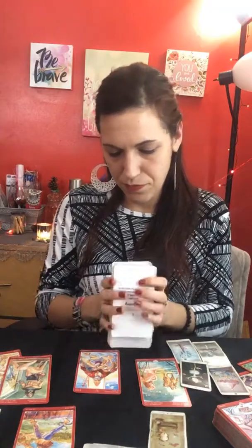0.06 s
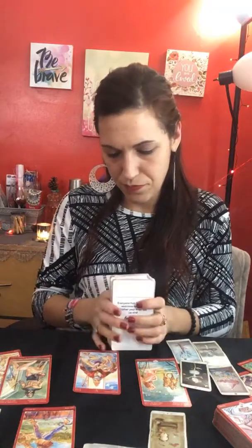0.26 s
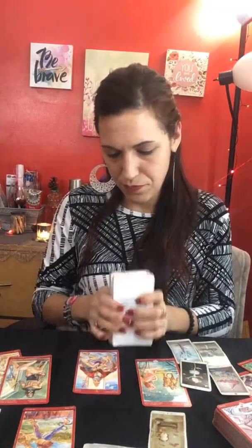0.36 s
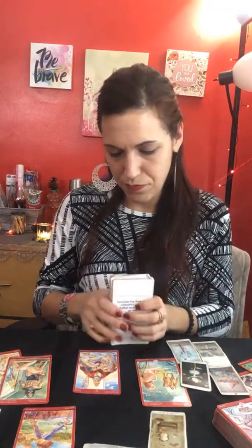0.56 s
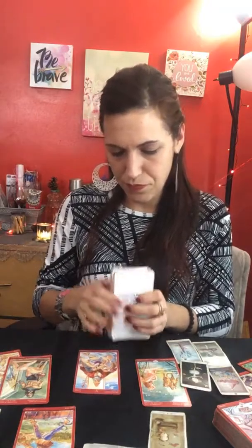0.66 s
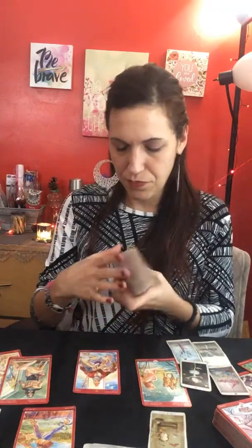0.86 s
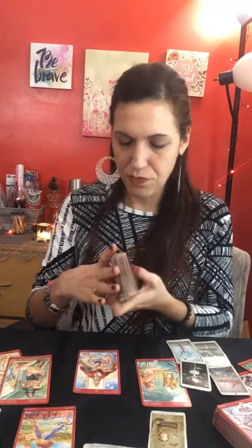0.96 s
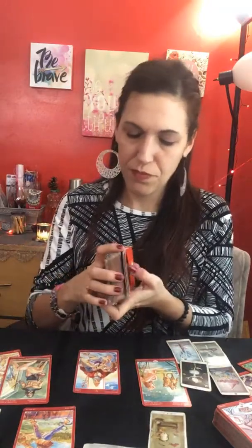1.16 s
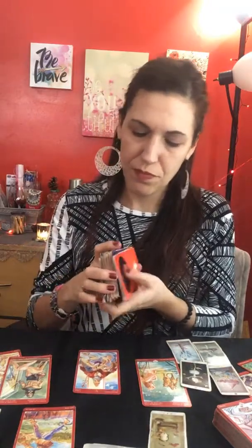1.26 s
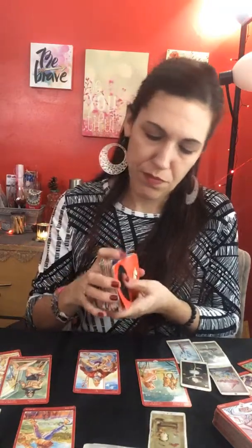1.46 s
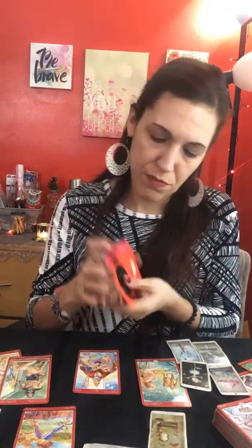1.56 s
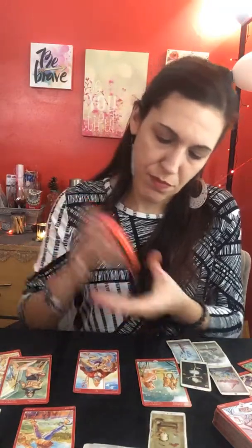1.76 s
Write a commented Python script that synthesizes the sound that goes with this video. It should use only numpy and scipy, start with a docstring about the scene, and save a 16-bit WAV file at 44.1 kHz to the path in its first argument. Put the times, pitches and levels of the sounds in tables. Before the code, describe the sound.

A deck of cards is handled with faint sliding and ticking. At about 0.2 seconds it is knocked on a cloth-covered table with a clack and a brief wooden ring, followed by a duller bump at 0.6 seconds. A soft papery swish leads to one crisp card snap near 1.3 seconds, then more slides and ticks until 1.8 seconds. A small room adds a short echo and a low hum.

```python
"""Cards slide between the fingers and their edges tick. At 0.24 s the deck is knocked square on a
cloth-covered table: it clacks and the table top rings. At 0.62 s it is bumped down more softly.
Then it is lifted and turned with a papery swish, one card snaps at 1.34 s, and more slides and ticks
follow. All along, a small room echoes the cards over a low, wavering hum."""
import sys
import numpy as np
from scipy import signal
from scipy.fft import rfft, irfft, next_fast_len
from scipy.io import wavfile
from scipy.ndimage import map_coordinates

SR = 44100
rng = np.random.default_rng(int(sys.argv[2]) if len(sys.argv) > 2 else 0)


def wav_out(sig):
    """Save sig, one row per channel (or a flat mono array), as 16-bit PCM at SR to the path in sys.argv[1]."""
    wavfile.write(sys.argv[1], SR, np.round(np.clip(np.atleast_2d(sig).T, -1, 1) * 32767).astype(np.int16))


N = 79380  # 1.8 s

# The tone of the deck's clack: pitch_hz, level_db
CLACK_TONE = [(30, -46), (90, -13), (150, -3), (215, -8.5), (300, 6.5), (480, -10.5), (980, -5.5),
              (1130, -22), (1320, -11), (2000, -19.5), (2500, -29), (3400, -22.5), (4000, -60), (9000, -39),
              (16000, -32)]
# The table top's notes, struck at two spots: pitch_hz, first_spot_db, second_spot_db, fade_s
TABLE_NOTES = [(91.6, -58, -15, 0.27), (141.6, -25.5, -30.5, 0.22), (155.6, -18.5, -32, 0.24),
               (260, -48, -20, 0.24), (293.5, -29.5, -28.5, 0.21), (331, -30.5, -31, .22),
               (457, -29, -32.5, 0.075), (552, -33, -19.5, 0.17), (599.5, -37.5, -27.5, 0.1),
               (670, -41.5, -33, 0.091), (860, -46, -26, 0.082), (982, -27, -27.5, 0.028),
               (1298, -29, -45, 0.062)]
# The deck hits the table: start_s, level_db, brightness_hz, ring_db, sway_db, spot (0 first, 1 second)
DECK_HITS = [(0.2412, 0, 2850, 1, -25, 0), (0.2462, -16, 3260, -12, -22, 0),
             (0.6169, -24, 2560, 15, -4, 0.93), (0.6215, -3, 447, -0.5, 2, 0.71)]

def knocks():
    """Each hit clacks, rings the table top and sways the table; the last bump is a dull thump."""
    out, t = np.zeros(N), np.arange(SR) / SR
    sway_hz = 50.3
    sway = np.sin(2 * np.pi * sway_hz * t) * fade(t, 0.48) * (1 - np.exp(-t / 0.017))
    for start_s, level_db, brightness_hz, ring_db, sway_db, spot in DECK_HITS:
        treble_cut = lambda hz: 1 / np.sqrt(1 + (hz / brightness_hz) ** 5.5)
        clack = pulse(lambda hz: gain(look_up(CLACK_TONE, hz)) * treble_cut(hz))
        add(out, start_s, gain(level_db + 25) * clack)
        ring = np.zeros(len(t))
        for pitch_hz, first_spot_db, second_spot_db, fade_s in TABLE_NOTES:
            strength = gain(np.interp(spot, [0, 1], [first_spot_db, second_spot_db]))
            ring += strength * treble_cut(pitch_hz) * np.sin(2 * np.pi * pitch_hz * t) * fade(t, fade_s)
        ring *= 1 - np.exp(-t / 0.0023)  # the ring takes a moment to build
        add(out, start_s, gain(level_db) * (gain(ring_db) * ring + gain(sway_db - 26) * sway))
    # The cards do not all land at once: treble first, bass later.
    return delay_bass(out, late_s=0.001825, below_hz=1250)


# The dull tone of cards on cloth: pitch_hz, level_db
CLOTH_TONE = [(40, 0), (140, 0), (300, 8), (400, 6), (620, -3.5), (1000, -15), (1400, -27), (3000, -48),
              (12000, -58)]

def cloth_scuff():
    """Loose cards scuff the cloth just before the deck lands."""
    return gain(-26.5) * swell(peak_s=0.239, rise_s=0.009, fall_s=0.008) * noise(CLOTH_TONE)


# The tone of a card's edge: pitch_hz, level_db
TICK_TONE = [(100, -8), (300, 8), (900, 7.5), (1200, 1.5), (2100, 6.5), (2650, 7), (3400, -4.5), (4400, -2),
             (5800, -7.5), (6900, 4), (7800, -5.5), (9300, -0.5), (11000, -11), (13000, -3.5), (16000, -20)]
# Edges slip, and the loudest is the snap: start_s, level_db, thin_below_hz
EDGE_TICKS = [(0.012, -23, 294), (0.124, -21.5, 790), (0.24, -18, 1980), (0.29, -15, 7100),
              (0.6205, -23, 3000), (0.683, -22, 3000), (1.069, -14.5, 12000), (1.3441, 0.5, 200),
              (1.3466, -9.5, 510), (1.352, -18, 3000), (1.4155, -14, 1510), (1.455, -19, 4000),
              (1.491, -20.5, 4000), (1.6485, -18, 2000), (1.790, -18, 9200)]

def edge_ticks():
    """A card's edge slips off its neighbour with a crack; some ticks are full, others thin."""
    out, t = np.zeros(N), np.arange(SR // 40) / SR
    for start_s, level_db, thin_below_hz in EDGE_TICKS:
        grit = gain(-17) * rng.standard_normal(len(t)) * fade(t, 0.019)
        crack = (t == 0) + grit  # one sharp click, then a gritty slip
        thinning = lambda hz: hz ** 2 / np.hypot(hz ** 2, thin_below_hz ** 2)
        card = pulse(lambda hz: gain(look_up(TICK_TONE, hz)) * thinning(hz))
        add(out, start_s, gain(level_db - 18.5) * signal.fftconvolve(crack, card))
    # A slip is not instant: its low notes come a little late.
    return delay_bass(out, late_s=0.001, below_hz=5000)


# The bright swish, low scrape and papery rasp of sliding cards: pitch_hz, level_db
SWISH_TONE = [(500, -41), (2000, 0), (3300, 1.5), (5000, -6), (7000, 0.5), (10000, -1.5), (13000, -4.5),
              (16000, -11)]
SCRAPE_TONE = [(150, -11), (400, -1.5), (900, 9), (2000, 8), (3400, -6.5), (5000, -10), (12000, -43)]
RASP_TONE = [(1500, -25), (2700, -1), (3400, 0.5), (4200, -4), (4800, -9), (7000, -34)]
# Strokes of card over card: peak_s, rise_s, fall_s, level_db, scrape_db, rasp_db
CARD_SLIDES = [(0.008, 0.027, 0.023, -68, 8, -14), (0.128, 0.036, 0.017, -69, 0.5, -19),
               (0.209, 0.017, 0.0053, -65, -10, -15), (0.25, 0.015, 0.019, -59, -5, -23),
               (0.404, 0.055, 0.023, -63, 3, -8), (0.626, 0.0066, 0.011, -62.5, 5.5, -12),
               (0.678, 0.019, 0.024, -67, -4, -5), (0.96, 0.068, 0.071, -74, -2, -11),
               (1.201, 0.083, 0.075, -74.5, -18, -19), (1.374, 0.028, 0.04, -63, -1.5, -9),
               (1.465, 0.0087, 0.055, -74.5, -23, -12), (1.654, 0.059, 0.047, -64.5, -16, -13),
               (1.653, 0.0024, 0.023, -68.5, 8.5, 8.5)]

def card_slides():
    """Cards rub together in grainy swishes; pressure adds a low scrape, their edges a rasp."""
    swish, scrape, rasp = np.zeros((3, N))
    for peak_s, rise_s, fall_s, level_db, scrape_db, rasp_db in CARD_SLIDES:
        stroke = gain(level_db) * swell(peak_s, rise_s, fall_s)
        swish += stroke
        scrape += stroke * gain(scrape_db)
        rasp += stroke * gain(rasp_db)
    grain = normalize(gain(2 * wobble(per_s=1800) + wobble(per_s=70)))
    return grain * (swish * noise(SWISH_TONE) + scrape * noise(SCRAPE_TONE) + rasp * noise(RASP_TONE))


# How long the room's echo lasts: pitch_hz, fade_s
ECHO_FADE = [(100, 0.36), (400, 0.31), (1500, 0.22), (4000, 0.2), (12000, 0.4)]
# The tone of that echo: pitch_hz, level_db
ECHO_TONE = [(50, -14.5), (250, -1.5), (600, -7.5), (1500, -4.5), (3500, -8), (12000, -21.5)]

def room_echo(sound):
    """The walls throw the sound back as a short, blurred echo."""
    hz, t, bands = signal.stft(rng.standard_normal(SR // 2), SR, nperseg=256)
    bands *= fade(t, look_up(ECHO_FADE, hz)[:, None])
    tail = signal.istft(bands, SR, nperseg=256)[1]
    echo = np.zeros(N)
    add(echo, start_s=0.004, sound=signal.fftconvolve(sound, tail / np.linalg.norm(tail)))
    return filtered(echo, lambda hz: gain(look_up(ECHO_TONE, hz)))


# The notes of the room's hum: pitch_hz, level_db, wavers_per_s, waver_db
HUM_NOTES = [(46, -55, 9.22, 9), (111, -61.5, 14.5, 2.5), (150.2, -64, 12.04, 9), (243.7, -55, 4.11, 4.5),
             (278.5, -64, 8.8, -1), (321.4, -61.5, 7.8, 5)]
# The tone of the room's air: pitch_hz, level_db
AIR_TONE = [(15, -27), (30, -21), (44, -1.5), (70, -1.5), (127, -1.5), (190, -8), (260, -7.5), (370, -14),
            (470, -11), (560, -23), (825, -27), (1330, -30.5), (2460, -36), (4940, -46), (14700, -48.5),
            (16000, -53)]

def room_hum():
    """Low notes waver at random over the soft rumble of the room's air."""
    hum, t = np.zeros(N), np.arange(N) / SR
    for pitch_hz, level_db, wavers_per_s, waver_db in HUM_NOTES:
        loudness = gain(waver_db * wobble(wavers_per_s))
        drift_radians = 0.73 * wobble(wavers_per_s)
        hum += gain(level_db) * normalize(loudness * np.sin(2 * np.pi * pitch_hz * t + drift_radians))
    return hum + gain(-51.5) * noise(AIR_TONE)


def gain(db):
    """Turn decibels into a multiplier."""
    return 10 ** (np.asarray(db) / 20)


def normalize(sound):
    """Scale to an average (rms) level of 1."""
    return sound / np.sqrt(np.mean(sound ** 2) + 1e-20)


def look_up(table, hz):
    """Read a table at any pitch, sliding between its rows on a log scale."""
    pitches, values = np.transpose(table)
    return np.interp(np.log(hz + 1), np.log(pitches + 1), values)


def wobble(per_s):
    """A smooth curve through per_s random values each second."""
    return map_coordinates(rng.standard_normal(N // 8), [np.arange(N) * per_s / SR], mode="wrap")


def filtered(sound, gain_at):
    """Multiply each pitch in the sound by gain_at(hz)."""
    size = next_fast_len(N + SR // 2)
    return irfft(rfft(sound, size) * gain_at(np.fft.rfftfreq(size, 1 / SR)), size)[:N]


def noise(tone):
    """Noise at level 1, shaped by a tone table."""
    return normalize(filtered(rng.standard_normal(N), lambda hz: gain(look_up(tone, hz))))


def pulse(gain_at, size=8192):
    """A click whose strength at each pitch is gain_at(hz)."""
    spectrum = np.maximum(gain_at(np.fft.rfftfreq(size, 1 / SR)), 1e-6)
    cepstrum = irfft(np.log(spectrum))
    # Folding the second half onto the first makes the click start sharply.
    cepstrum[1:size // 2] *= 2
    cepstrum[size // 2 + 1:] = 0
    return irfft(np.exp(rfft(cepstrum)))


def fade(t, fade_s):
    """Die away by 60 dB in fade_s."""
    return np.exp(-np.log(1000) * t / fade_s)


def swell(peak_s, rise_s, fall_s):
    """Rise smoothly to a peak, then fall."""
    t = np.arange(N) / SR - peak_s
    return np.exp(-0.5 * (t / np.where(t < 0, rise_s, fall_s)) ** 2)


def delay_bass(sound, late_s, below_hz):
    """Smear a sound so its low notes arrive up to late_s after its high ones."""
    return filtered(sound, lambda hz: np.exp(-2j * np.pi * late_s * below_hz * np.arctan(hz / below_hz)))


def add(out, start_s, sound):
    """Mix a sound into out, beginning at start_s."""
    first = max(0, round(start_s * SR))
    out[first:first + len(sound)] += sound[:max(0, N - first)]


def scene():
    """The cards, their echo and the hum, in one channel."""
    cards = knocks() + cloth_scuff() + edge_ticks() + card_slides()
    return (cards + gain(-2) * room_echo(cards) + room_hum())[None]


def record(dry):
    """Drop the deepest bass and the highest treble."""
    lowest_hz, highest_hz = 25.3, 16000
    bass_cut = signal.butter(4, lowest_hz, "highpass", fs=SR, output="sos")
    return filtered(signal.sosfilt(bass_cut, dry[0]), lambda hz: hz < highest_hz)[None]


dry = scene()
out = record(dry)
wav_out(out)
```